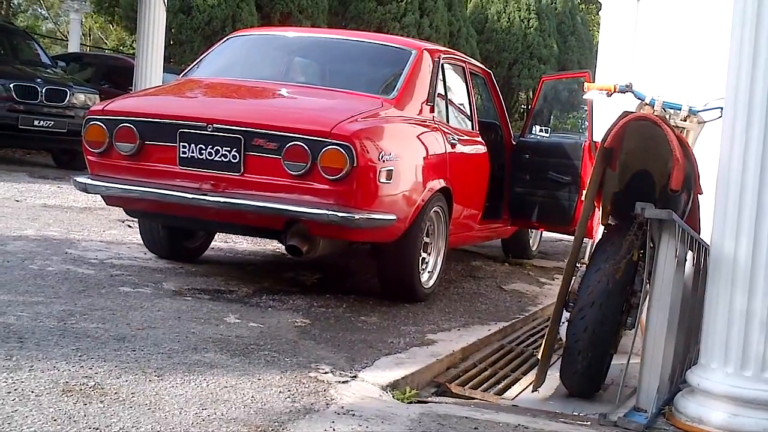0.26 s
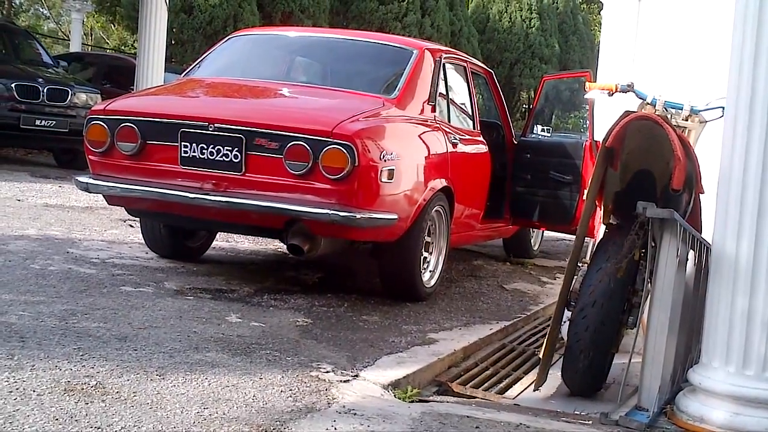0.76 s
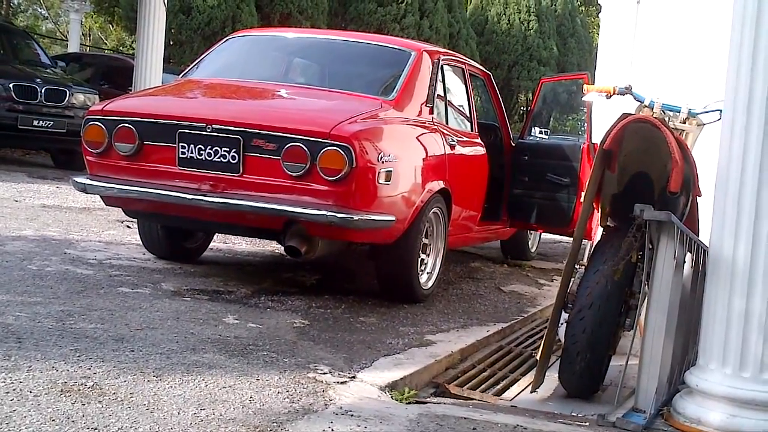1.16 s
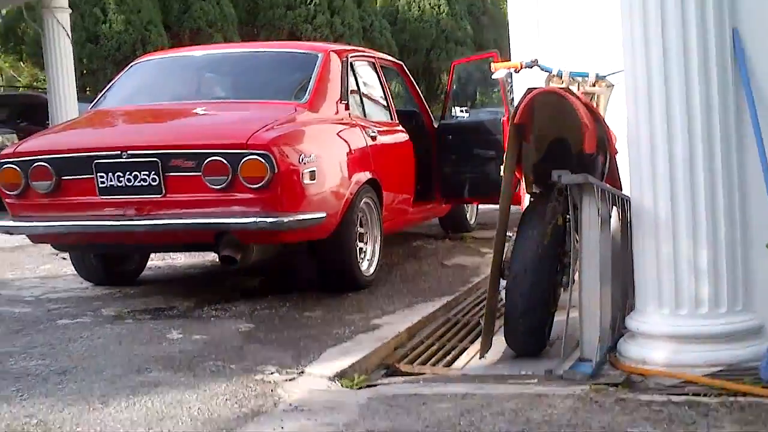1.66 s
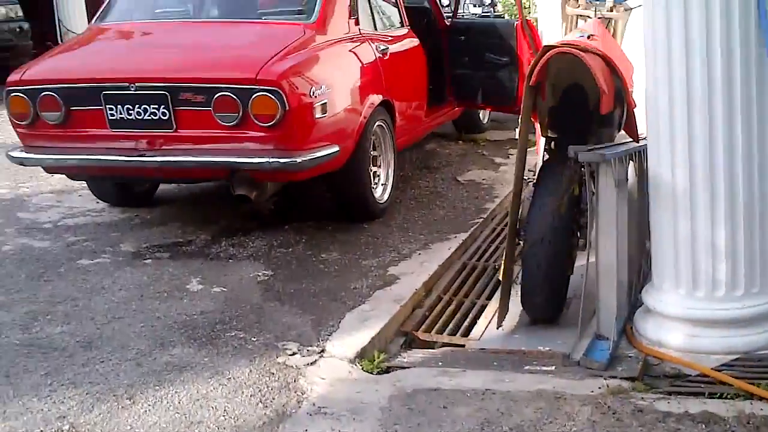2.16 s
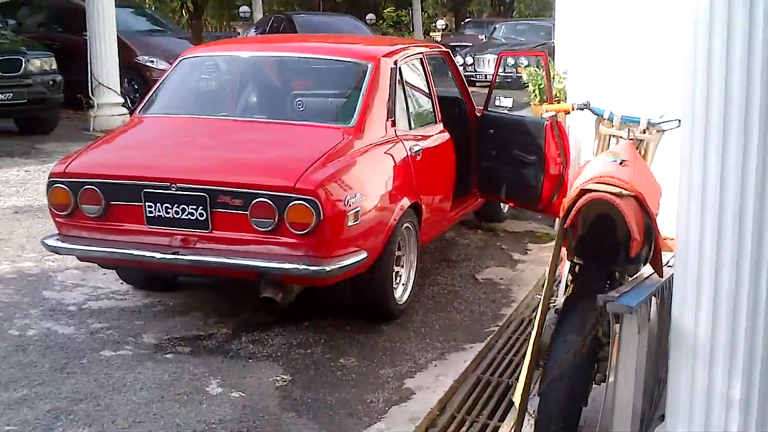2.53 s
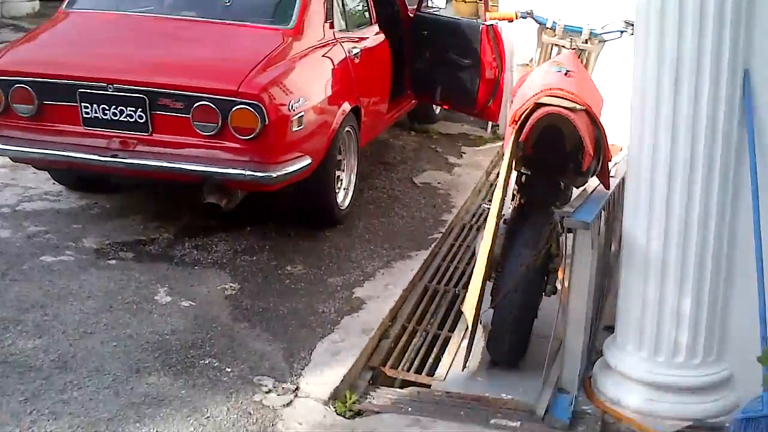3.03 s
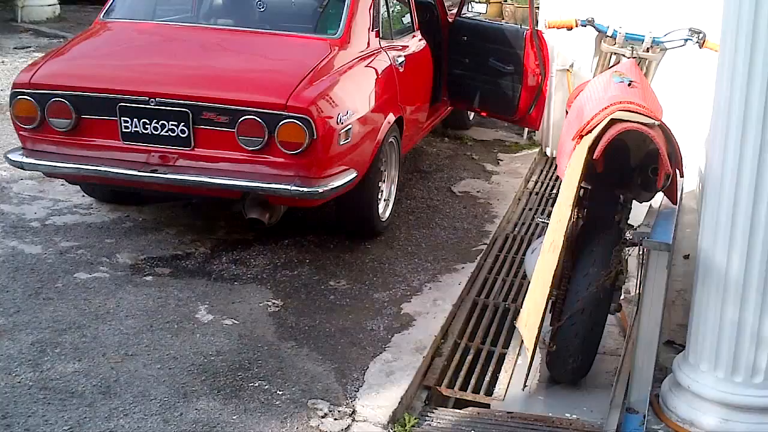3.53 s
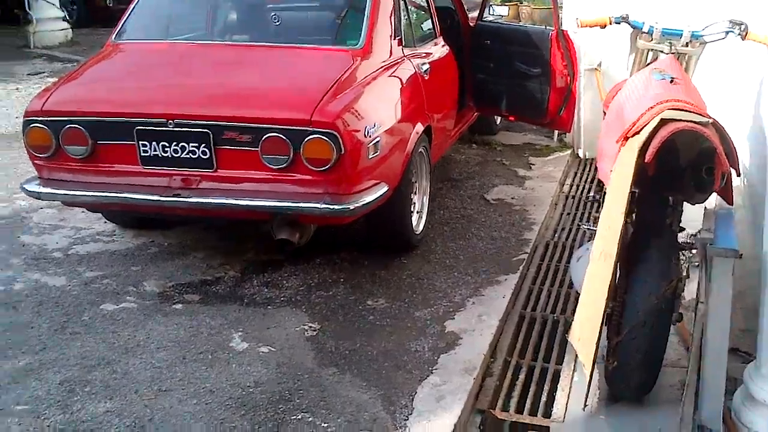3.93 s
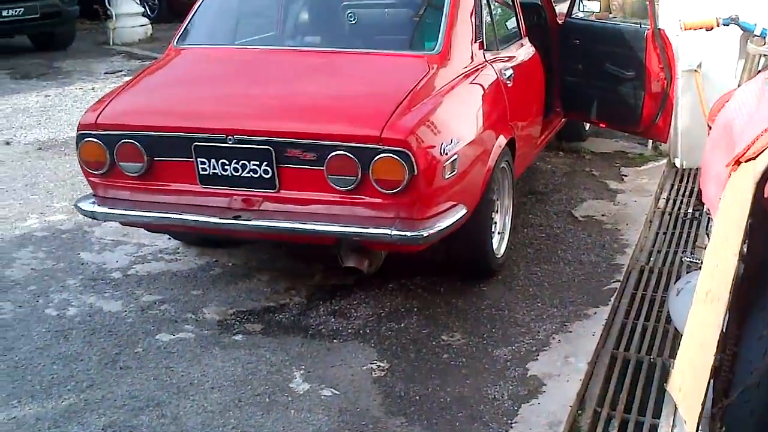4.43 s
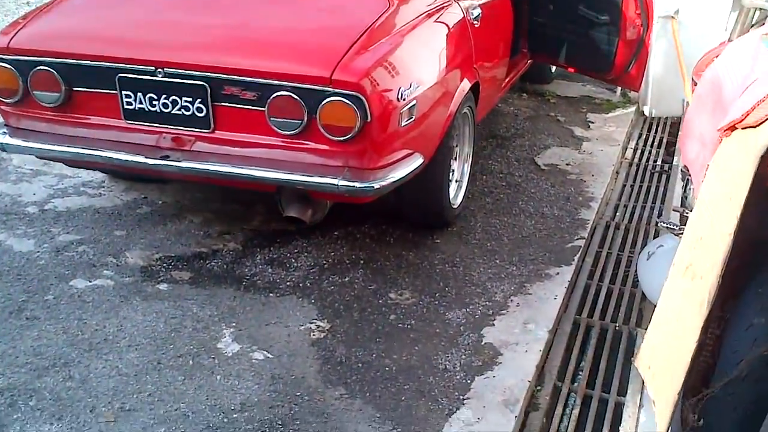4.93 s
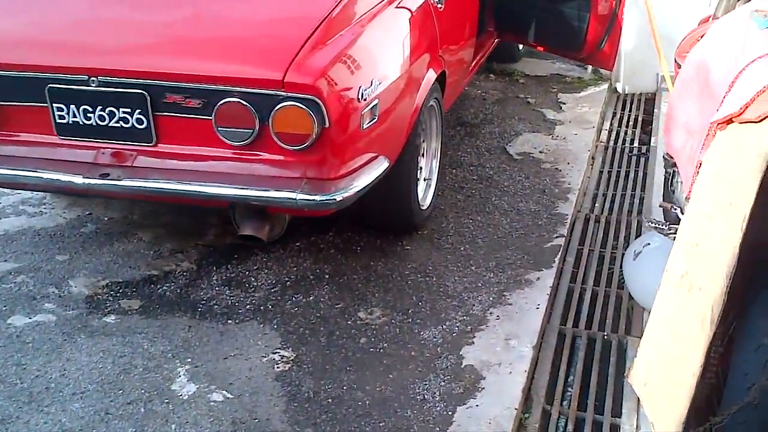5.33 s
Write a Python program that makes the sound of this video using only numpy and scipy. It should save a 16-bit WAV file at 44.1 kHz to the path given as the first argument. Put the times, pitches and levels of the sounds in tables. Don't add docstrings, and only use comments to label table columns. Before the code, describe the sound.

Continuous loping engine idle, heard outdoors from a few metres behind the car. Quick groups of loud, hollow, raspy pops alternate with soft low burbling that slows before the next surge catches. Low muffler boom, metallic pipe ring, airy fan noise and a thin steady hum accompany it. A small camera microphone walks closer midway, ending near the tailpipe with a fuller sound.

```python
import sys
import numpy as np
from scipy import signal
from scipy.fft import rfft, irfft, next_fast_len
from scipy.io import wavfile

SR = 44100
rng = np.random.default_rng(int(sys.argv[2]) if len(sys.argv) > 2 else 0)


def to_linear_factor(level_db):
    exponent = np.asarray(level_db, float) / 20
    return 10 ** exponent


def to_wav(sig):
    pcm = np.clip(np.atleast_2d(sig), -1, 1) * 32767
    pcm = np.round(pcm).astype(np.int16)
    wavfile.write(sys.argv[1], SR, pcm.T)


N = 246519

STEP_S = 1.6, 3.38


def moved():
    return np.interp(np.arange(N) / SR, STEP_S, [0, 1])


def at_hz(points, hz):
    points = np.array(points)
    return np.interp(np.log(hz), np.log(points[:, 0]), points[:, 1])


def rms_one(x):
    return x / np.sqrt(np.mean(x ** 2) + 1e-20)


def highpass(x, hz):
    return signal.sosfiltfilt(signal.butter(2, hz, "high", fs=SR, output="sos"), x)


def drift(rate):
    knots = rng.standard_normal(1200)
    return 1.2 * np.interp(np.arange(N) * min(2 * rate, 200) / SR, np.arange(1200), knots)


def resonance(x, hz, width_hz):
    r = np.exp(-np.pi * width_hz / SR)
    poles = [1, -2 * r * np.cos(2 * np.pi * hz / SR), r * r]
    return signal.lfilter((1 - r * r) / 2 * np.array([1, 0, -1]), poles, x)


def moving_resonance(x, hz, width_hz):
    out, state = np.zeros(N), np.zeros(2)
    r = np.exp(-np.pi * width_hz / SR)
    for i in range(0, N, 1024):
        poles = [1, -2 * r * np.cos(2 * np.pi * hz[i] / SR), r * r]
        zeros = [(1 - r * r) / 2, 0, (r * r - 1) / 2]
        out[i:i + 1024], state = signal.lfilter(zeros, poles, x[i:i + 1024], zi=state)
    return out


def coloured(spectra, patchy_db, rate, low_hz, octaves, count):
    size = next_fast_len(N)
    hz = np.arange(size // 2 + 1) * SR / size + 1
    white = rfft(rng.standard_normal(size))
    band_place = np.clip(np.log2(hz / low_hz) / octaves, 0, 1) * (count - 1)
    patchy = np.zeros(N)
    for k in range(count):
        share = np.clip(1 - abs(band_place - k), 0, 1)
        patchy += irfft(white * share, size)[:N] * to_linear_factor(patchy_db * drift(rate))
    patchy = rfft(patchy, size)
    first, second = [rms_one(irfft(patchy * to_linear_factor(at_hz(points, hz)), size)[:N]) for points in spectra]
    return first + moved() * (second - first)


# frequency in Hz, level in dB per Hz.
RUSH_SPECTRA = [
    [(130, -31), (220, -0.5), (363, -7), (419, -3), (519, -12), (952, -14), (1410, -26.5), (1690, -25), (2370, -32.5), (5110, -38.5), (8730, -51.5), (14700, -46), (15700, -54)],
    [(130, -20), (220, 1), (466, -13), (840, -8.5), (952, -15.5), (1270, -19.5), (1490, -27), (1720, -23.5), (2680, -34.5), (5490, -41.5), (8420, -51), (14700, -48.5), (15700, -49)],
]


def rush(low_db, high_db):
    air = coloured(RUSH_SPECTRA, patchy_db=1.5, rate=14, low_hz=236, octaves=5.0, count=10)
    bright = highpass(air, 2500)
    middle = signal.sosfilt(signal.butter(2, [300, 2500], "band", fs=SR, output="sos"), air)
    return to_linear_factor(low_db) * (air - bright) / np.std(middle) + to_linear_factor(high_db - 4.0) * rms_one(bright)


PUMP_HZ = 418, 627, 837, 1045, 1255, 1675, 7519
# level at the first place in dB, level at the second in dB.
PUMP_LEVELS = [(-50.5, -53.5), (-59.5, -58), (-63.5, -53), (-64, -75), (-69.5, -65.5), (-81, -73),
               (-79, -82)]


def pump(gain_db):
    t = np.arange(N) / SR + 0.00008 * drift(5)
    hum = np.zeros(N)
    for hz, (first_db, second_db) in zip(PUMP_HZ, PUMP_LEVELS):
        level_db = first_db + (second_db - first_db) * moved() + 2.0 * drift(6)
        hum += to_linear_factor(level_db) * np.sin(2 * np.pi * hz * t)
    return to_linear_factor(gain_db + 2.0) * hum


# start in seconds, peak level in dB, pitch in Hz.
TICKS = [(0.1401, -43, 2000), (0.2029, -46, 1960), (0.8689, -40, 2030), (0.9343, -45, 1850),
         (1.0574, -43, 1820), (1.1064, -41, 2030), (1.4556, -39, 2010), (1.5179, -42, 2080),
         (1.5559, -34.5, 2350), (1.9839, -46, 1790), (2.1066, -41, 2000), (2.7606, -41, 1910),
         (2.8379, -40, 2050), (3.4136, -38, 2130), (4.0527, -39, 2150), (5.3433, -38, 2180)]
# start in seconds, peak level in dB, pitch in Hz.
KNOCKS = [
    (2.105, -29, 416),
    (2.74, -36, 353),
    (2.76, -31, 740),
    (3.316, -31, 417),
]


def ticks():
    out, t = np.zeros(N + 1500), np.arange(1500) / SR
    rows = TICKS + KNOCKS
    side_ratios = rng.uniform(0.7, 1.5, (len(rows), 4))
    for (s, peak_db, hz), sides in zip(rows, side_ratios):
        age = t * hz ** 0.5 / 0.082
        ring = np.sin(2 * np.pi * hz * t) + 0.4 * np.sin(2 * np.pi * hz * np.outer(sides, t)).sum(axis=0)
        start = round(s * SR)
        out[start:start + len(t)] += to_linear_factor(peak_db - 5.0) * age * np.exp(1 - age) * ring
    return out[:N]


# gap to the next in ms, puff level in dB, pipe echo in dB, hiss level in dB.
PATTERN = [(49.0, -7.2, -5.3, -39.5), (46.0, -7, -8.5, -40), (42.6, -4.8, -6.3, -37.7),
           (50.7, -3.4, -10.5, -36.3), (48.2, -15.3, -3.5, -58), (52.9, -13, -7.5, -57),
           (56.7, -15, -3.3, -54.5), (65.5, -12.3, -10, -54), (60.7, -10.3, -1.8, -55),
           (65.2, -14.5, -7.5, -51.5), (57.8, -13, -2.8, -48.3), (55.2, -11.5, -7.5, -48.8)]
# rise in ms, fall in ms.
SLUG = [(1.1, 0.95), (1.15, 0.8), (1.1, 0.65), (0.65, 0.85), (0.57, 4.9), (1.2, 5.0), (0.95, 5.0),
        (1.4, 4.7), (1.6, 6.0), (2.2, 0.7), (3.5, 0.75), (1.3, 1.1)]
# first strong firing, last strong firing and slowest firing in seconds,
# gain of the strong four in dB, gain of the weak eight in dB.
SURGES = [(-0.4730, -0.3350, -0.0620, 0.1, 1.1), (0.1701, 0.3097, 0.5974, -0.4, 0.1),
          (0.8458, 0.9832, 1.2517, -0.1, -0.2), (1.4888, 1.6280, 1.9060, -1.1, -0.4),
          (2.1472, 2.2853, 2.5578, 0.1, -0.6), (2.7970, 2.9372, 3.2107, -0.8, -1.1),
          (3.4477, 3.5819, 3.8489, 0.1, -0.4), (4.0890, 4.2264, 4.4970, 0.1, 1.2),
          (4.7310, 4.8673, 5.1420, 1.8, 2.1), (5.3769, 5.5142, 5.7890, 2.1, 1.5)]
# time in seconds, puff change in dB, hiss change in dB.
ODD = [(0.0601, 1.5, 0.6), (0.1701, 0.1, 2.5), (0.2201, -0.6, 2.5), (0.2670, 0.1, 2.5), (0.3097, 0.1, 1.8),
       (0.5974, -4.5, 2.1), (0.7885, 0.1, 3.5), (0.9832, 1.6, 3.5), (1.0352, -6.5, -4.1),
       (1.2517, 2.1, -2.1), (1.6280, 1.5, 0.6), (1.8390, -1.6, -0.6), (1.9060, -2.1, -2.1),
       (1.9688, -1.8, -1.1), (2.4353, -2.5, 2.1), (2.6176, -1.6, 1.5), (2.6849, 0.1, 1.8),
       (2.7970, 1.1, 4.5), (2.9372, -0.6, -2.5), (3.0345, -5.5, -9.1), (3.4477, -0.9, -3.6),
       (3.5819, -2.1, -0.6), (3.8489, 2.1, 0.6), (4.2264, -0.6, 1.1), (4.5561, 1.1, 6.5),
       (4.6197, 0.9, 4.5), (4.7310, -0.6, 3.5), (5.2654, 1.1, 0.6), (5.3769, -1.1, 0.6),
       (5.5142, -0.9, -2.5)]
HISS_FOLLOWS = 0.35
ECHO_GAINS_DB = 2.5


def firings():
    gap_ms, puff_db, echo_db, hiss_db = np.tile(np.transpose(PATTERN), len(SURGES))
    clock, surges = np.cumsum(gap_ms) - gap_ms, np.array(SURGES)
    marks = clock.reshape(len(SURGES), -1)[:, [0, 3, 8]].ravel()
    s = np.interp(clock, marks, surges[:, :3].ravel())
    gain_db = np.repeat(surges[:, 3:].ravel(), [4, 8] * len(SURGES))
    echo_db = echo_db + ECHO_GAINS_DB * np.interp(s, STEP_S, [0, 1])
    slugs = np.tile(SLUG, (len(SURGES), 1))
    rows = np.c_[np.maximum(s, 0), puff_db + gain_db, echo_db, slugs, hiss_db + HISS_FOLLOWS * gain_db]
    for odd_s, more_puff_db, more_hiss_db in ODD:
        rows[np.argmin(abs(s - odd_s)), [1, 5]] += more_puff_db, more_hiss_db
    return rows[(s > -0.02) & (s < N / SR)]


def dying(level_db, attack_ms, decay_ms, late_ms):
    kicks = np.zeros(N)
    at = ((firings()[:, 0] + late_ms / 1000) * SR).astype(int)
    kicks[np.clip(at, 0, N - 1)] = to_linear_factor(2 * level_db)
    rise, fall = np.exp(-1000 / SR / attack_ms), np.exp(-2000 / SR / decay_ms)
    power = signal.lfilter([1], [1, -fall], kicks + 1e-18)
    return np.sqrt(signal.lfilter([1 - rise], [1, -rise], power))


ECHO_S = 0.01507
FRONT_ECHO_DB = -3.0


def along_pipe(x):
    lag = round(ECHO_S * SR)
    out = x
    for k in (1, 2, 3):
        out = out + to_linear_factor(k * FRONT_ECHO_DB) * np.r_[np.zeros(k * lag), x[:-k * lag]]
    return out


MOUNT_HZ, MOUNT_WIDTH_HZ, MOUNT_DB = 24.8, 3.4, -39.0
DRONE_HZ, DRONE_WIDTH_HZ, DRONE_DB = 182.3, 46, -39


def body():
    shake = dying(firings()[:, 5], attack_ms=3.4, decay_ms=6.9, late_ms=16.0)
    drone = rng.standard_normal(N)
    for _ in range(2):
        shake = resonance(shake, MOUNT_HZ, MOUNT_WIDTH_HZ)
        drone = resonance(drone, DRONE_HZ, DRONE_WIDTH_HZ)
    return to_linear_factor(MOUNT_DB) * rms_one(shake) + to_linear_factor(DRONE_DB) * rms_one(drone)


# frequency in Hz, level in dB, 60 dB decay time in seconds.
TAILPIPE = [(319, 11.5, 0.028), (458, 5, 0.034), (720, 0, .03), (890, -6, 0.021), (1123, -10, 0.034),
            (4110, -18, 0.15), (4500, -18, 0.023), (5200, -7, 0.039), (6340, -0.5, 0.0067),
            (7140, -19, 0.0091), (9740, -16, 0.018), (13100, -8, .012), (14460, -6, .01)]


def rings():
    rows = firings()
    s, hiss_db = rows[:, 0], rows[:, 5]
    at = np.clip(((s - 0.0008) * SR).astype(int), 0, N - 1)
    luck_db = 1.83 * rng.standard_normal((len(s), len(TAILPIPE)))
    out = np.zeros(N)
    for k, (hz, level_db, t60) in enumerate(TAILPIPE):
        beam_db = (hz > 6000) * 10.5 * (moved()[at] - 0.5)
        clicks = np.full(N, 1e-18)
        clicks[at] = to_linear_factor(hiss_db + level_db + luck_db[:, k] + beam_db)
        if hz < 2000:
            clicks = signal.sosfilt(signal.butter(2, 1300, fs=SR, output="sos"), along_pipe(clicks))
        r, w = to_linear_factor(-60 / (t60 * SR)), 2 * np.pi * hz / SR
        out += signal.lfilter([0, np.sin(w)], [1, -2 * r * np.cos(w), r * r], clicks)
    return out


# frequency in Hz, level in dB per Hz.
HISS_SPECTRA = [
    [(1470, -21), (2500, -14), (3760, -9), (5040, -2), (5880, -6.5), (7630, -12), (9770, -8), (12100, -13.5), (14600, -13.5), (15700, -10)],
    [(1470, -25), (2500, -10), (3480, -7.5), (4250, -0.5), (5280, 0.5), (6650, -1), (8770, -10.5), (12800, -2.5), (14500, -12.5), (15700, -11)],
]


def hiss(whistle_hz):
    jet = coloured(HISS_SPECTRA, patchy_db=3.2, rate=60, low_hz=3010, octaves=2.27, count=12)
    whistle = moving_resonance(jet, whistle_hz, width_hz=190)
    whistle = moving_resonance(whistle, whistle_hz, width_hz=420)
    hiss_db = firings()[:, 5]
    crack = dying(hiss_db + 1.5, attack_ms=1.1, decay_ms=4.4, late_ms=-1.3)
    tail = dying(hiss_db - 4.5, attack_ms=4.5, decay_ms=42.7, late_ms=-0.2)
    rasp = dying(0.7 * hiss_db - 15.5, attack_ms=4.5, decay_ms=53, late_ms=-0.36)
    rasp = rasp * to_linear_factor(4.3 * drift(70))
    return jet * np.hypot(crack, tail) + whistle * rasp


# frequency in Hz, level in dB per Hz.
ROAR_SPECTRA = [
    [(120, -37), (200, 0), (232, -20.5), (325, -1), (365, -24.5), (398, -25.5), (476, -15), (523, -22.5), (946, -22), (1400, -50.5), (2500, -65), (3250, -89), (5500, -120)],
    [(120, -12), (200, -7.5), (222, -12.5), (290, -5), (447, -35.5), (726, -16), (986, -46.5), (1220, -35.5), (1490, -44.5), (1730, -34), (2500, -59.5), (3250, -75), (5500, -120)],
]


def roar(gain_db, peak_hz):
    gas = coloured(ROAR_SPECTRA, patchy_db=1.5, rate=33, low_hz=195, octaves=2.97, count=8)
    gas = gas + 0.27 * moving_resonance(gas, peak_hz, width_hz=360)
    rows = firings()
    force_db = rows[:, 5] * 0.65 + rows[:, 1] * 0.72
    slap = along_pipe(dying(force_db + 6.0, attack_ms=0.9, decay_ms=4.5, late_ms=-1.26))
    tail = dying(force_db, attack_ms=8.1, decay_ms=60, late_ms=1.8)
    return to_linear_factor(gain_db - 4.5) * gas * np.hypot(slap, tail)


# frequency in Hz, width in Hz, share of the puff (negative: phase reversed).
MUFFLER = [(84.8, 20.8, 1.42), (135, 87, 1.126), (189.1, 7.6, 1.17), (196.6, 71, -1), (310, 15, 0.53)]
ECHO_BLUR, SECOND_ECHO_DB = 1.28, -7.0
CHAMBER_S, CHAMBER_DB = 0.02647, -20
RADIATION_HZ = 52.0


def puffs():
    lead = 1200
    flow = np.zeros(N + 8000)
    t = (np.arange(4000) - lead) / SR
    for s, puff_db, echo_db, rise_ms, fall_ms, _ in firings():
        returns = [(0, 0, 1), (CHAMBER_S, CHAMBER_DB, ECHO_BLUR), (ECHO_S, echo_db, ECHO_BLUR),
                   (2 * ECHO_S, echo_db + SECOND_ECHO_DB, ECHO_BLUR ** 2)]
        start = round(s * SR)
        for lag, gain_db, blur in returns:
            u = 1000 * (t - lag) / blur
            slug = 2 / (np.exp(np.minimum(-u / rise_ms, 50)) + np.exp(np.minimum(u / fall_ms, 50)))
            flow[start:start + len(t)] -= to_linear_factor(puff_db + gain_db) * slug
    sound = signal.sosfilt(signal.butter(2, RADIATION_HZ, "high", fs=SR, output="sos"), flow)
    sound = sound + sum(share * resonance(sound, hz, width) for hz, width, share in MUFFLER)
    return highpass(sound, 30)[lead:lead + N]


# time in seconds, nearness in dB, pump level as it comes into view in dB.
PLACE = [(0.0, 0.1, 0.1), (1.1, 0.1, 2.6), (2.4, 0.4, 2.6), (3.3, 0.6, -0.6), (3.95, 0.8, -4.5),
         (4.25, 1.3, 4.5), (4.8, 2.1, 5.5), (5.25, 2.3, 4.5), (5.59, 2.6, -3.5)]
# level in dB, dB per dB of engine speed, dB per dB of nearness.
RUSH_LAW = [
    (-44, 1.2, 0.6),
    (-51.3, 1.2, 1.3),
]
ROAR_GAIN_DB, GROUND_HZ, LIP_HZ = (2.6, 2.1), (630, 700), (5120, 5330)
LIP_HZ_PER_DB = -65.0


def scene():
    t, s = np.arange(N) / SR, firings()[1:, 0]
    place_s, near_points, hum_points = np.transpose(PLACE)
    near_db, hum_db = np.interp(t, place_s, near_points), np.interp(t, place_s, hum_points)
    gaps = np.diff(s)
    speed_db = np.interp(t, s[1:], -20 * np.log10(gaps / gaps.mean()))
    low_db, high_db = [level_db + by_speed * speed_db + by_near * near_db
                       for level_db, by_speed, by_near in RUSH_LAW]
    roar_db, peak_hz, lip_hz = [a + (b - a) * moved() for a, b in (ROAR_GAIN_DB, GROUND_HZ, LIP_HZ)]
    background = rush(low_db, high_db) + pump(hum_db) + ticks() + body()
    exhaust = rings() + hiss(lip_hz + LIP_HZ_PER_DB * speed_db) + roar(roar_db, peak_hz) + puffs()
    return (background + exhaust)[None]


def roll_off(x):
    return signal.sosfilt(signal.butter(12, 15830, fs=SR, output="sos"), x)


def record(dry):
    cut = signal.sosfilt(signal.cheby2(16, 60, 15800, fs=SR, output="sos"), dry)
    return roll_off(cut)


dry = scene()
out = record(dry)
to_wav(out)
```